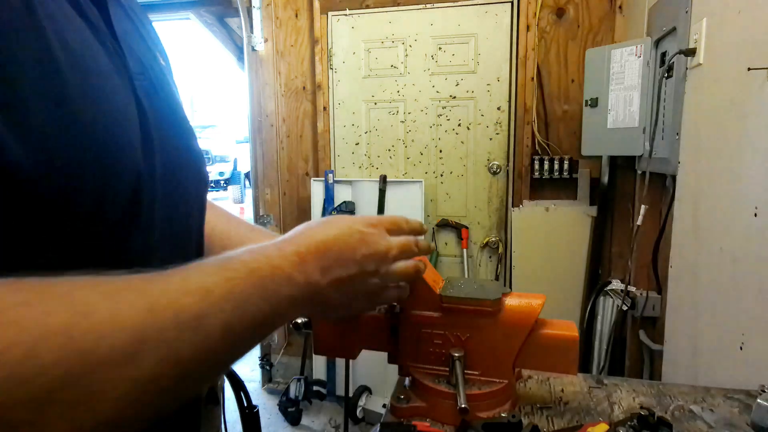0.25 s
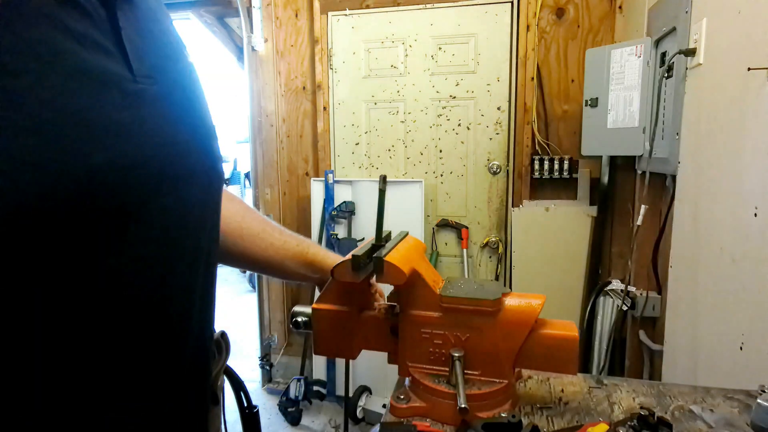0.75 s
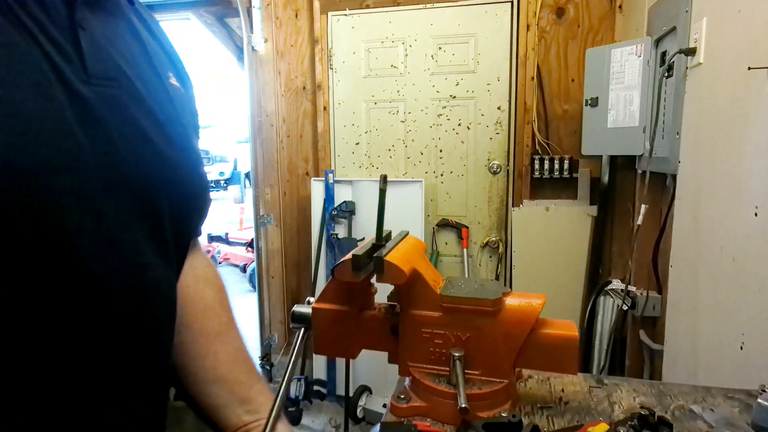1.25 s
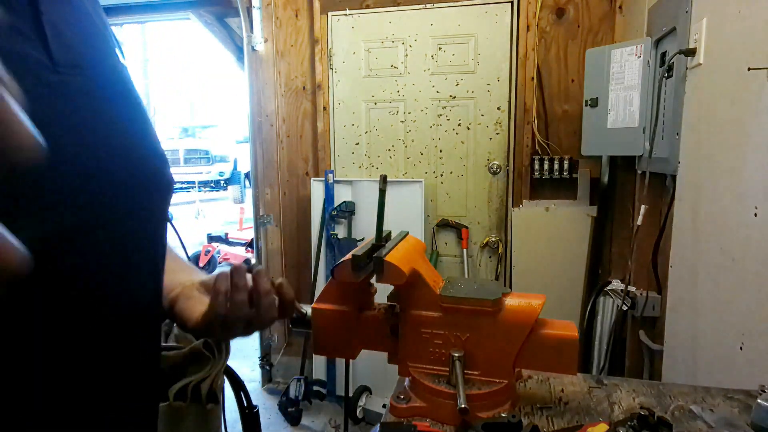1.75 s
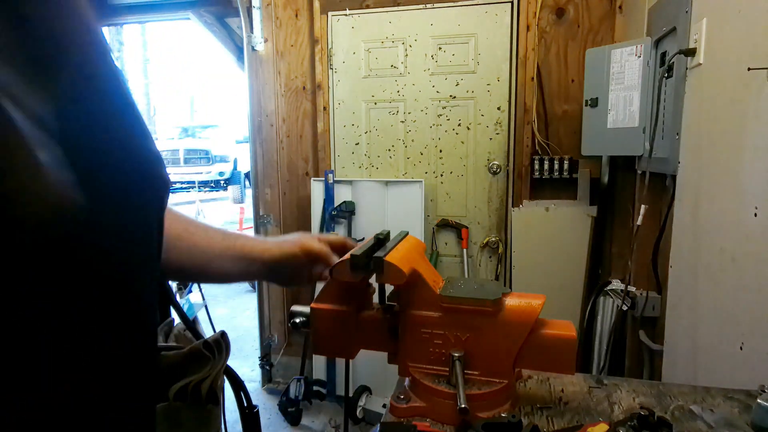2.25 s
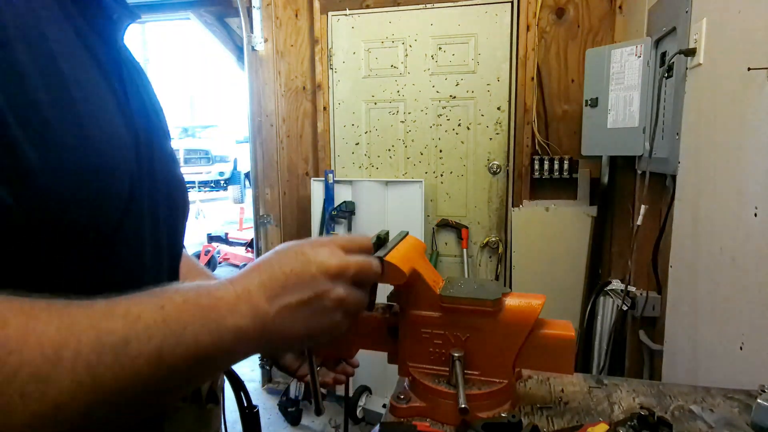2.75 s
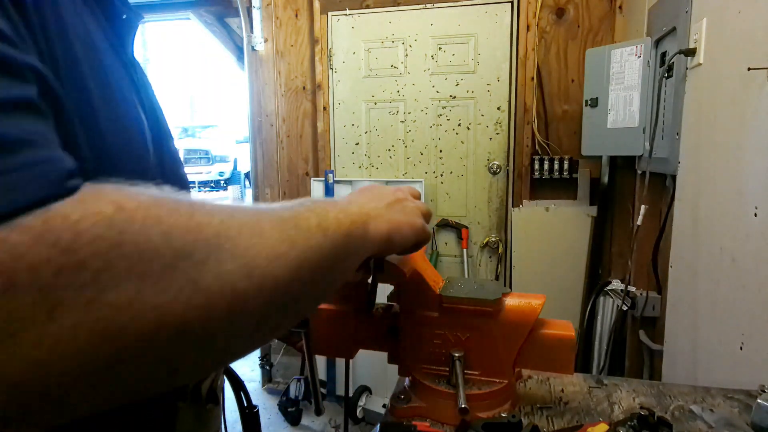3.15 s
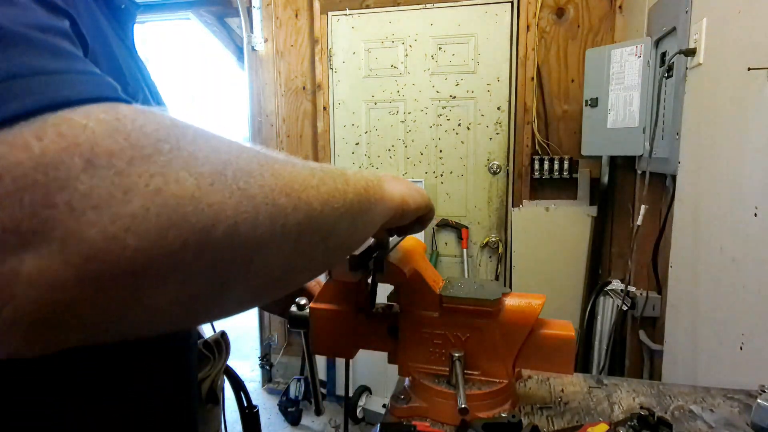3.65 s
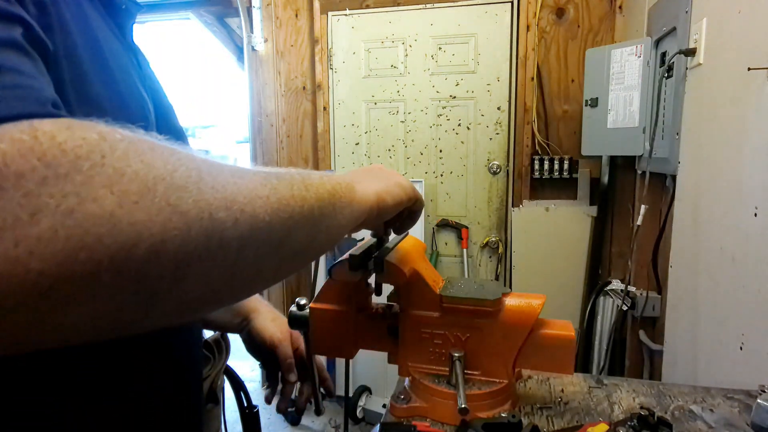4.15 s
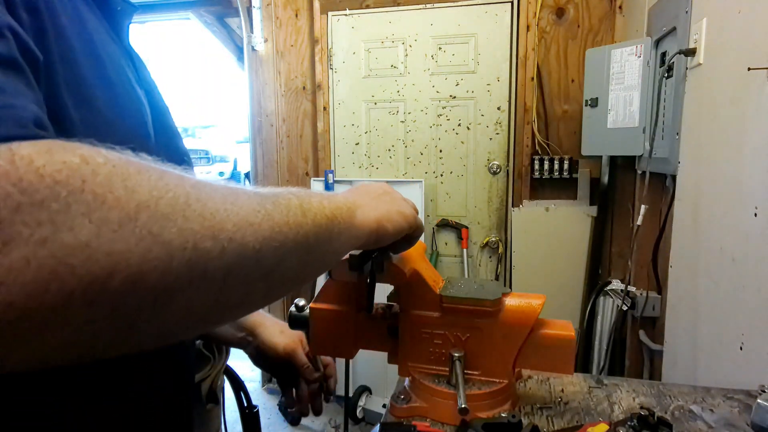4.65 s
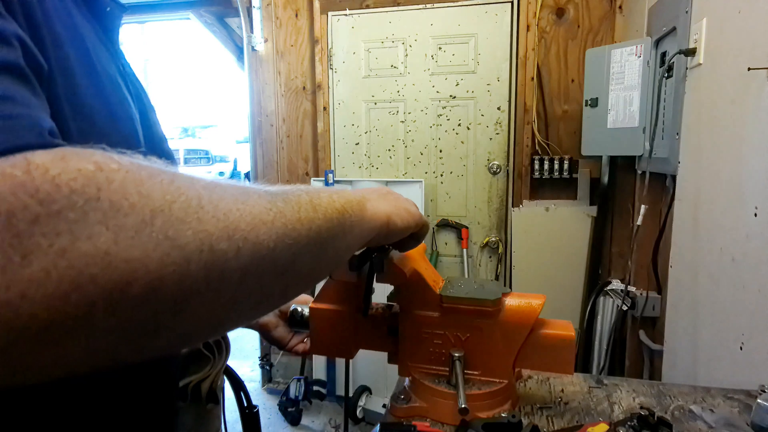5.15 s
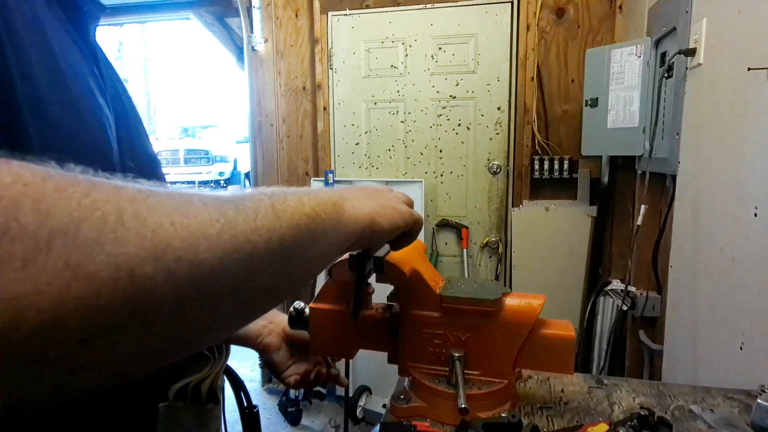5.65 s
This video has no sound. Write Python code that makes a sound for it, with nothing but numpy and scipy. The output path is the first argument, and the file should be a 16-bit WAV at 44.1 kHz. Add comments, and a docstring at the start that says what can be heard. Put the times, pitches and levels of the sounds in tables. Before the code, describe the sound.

In a small workshop, a cast vise clacks and rattles as its screw is turned, with cloth rustle and two overloaded microphone hits.

```python
"""Over faint rumble and hiss in a small wooden workshop, a cast bench vise knocks: modes plus decaying noise.
From 0.9 s cloth, probably a shirt, brushes the microphone (plucked resonances) as a hand turns the screw (slips).
At 1.28 and 1.38 s it flicks the microphone: cracks, thumps and pushes of air clip, and the gain ducks and creeps back.
From 2.2 s the bolt squeaks (a sine swell) and clinks between the jaws; the sliding handle and the slack screw
knock on until 5.7 s, ringing the steel parts. Soft bench bumps (low sines) are dotted about from 0.19 s."""
import sys
import numpy as np
from scipy import signal
from scipy.fft import rfft, irfft
from scipy.io import wavfile

SR = 44100
rng = np.random.default_rng(int(sys.argv[2]) if len(sys.argv) > 2 else 0)


def generate_wav(signal):
    """Clip the signal to [-1, 1] and save it as 16-bit WAV at the path in sys.argv[1]."""
    frames = np.transpose(np.atleast_2d(signal))
    scaled = np.clip(frames, -1, 1) * 32767
    pcm = np.round(scaled).astype(np.int16)
    wavfile.write(sys.argv[1], SR, pcm)


N = 260190
TIME = np.arange(N) / SR
AGE = TIME[:SR // 3]  # seconds since a blow


def from_db(db):
    """Decibels to gain."""
    return 10 ** (np.asarray(db) / 20)


def rms_one(x):
    """Scale to unit power."""
    return x / np.sqrt(np.mean(x ** 2) + 1e-20)


def at_hz(points, hz):
    """Read (Hz, dB) points on a log-frequency axis."""
    freqs, dbs = np.transpose(points)
    return np.interp(np.log(np.maximum(hz, 1)), np.log(freqs), dbs)


def decay(t60_s):
    """Envelope that falls 60 dB in t60_s."""
    exponent = AGE * (-np.log(1000) / max(t60_s, 1e-3))
    return np.exp(np.maximum(exponent, -40).astype(np.float32))


def noise(spectrum, size, tilt=None):
    """Noise coloured to unit power, then tilted if a tilt is given."""
    hz = np.arange(size // 2 + 1) * SR / size
    gain = rms_one(from_db(at_hz(spectrum, hz)))
    if tilt:
        gain = gain * from_db(at_hz(tilt, hz))
    return irfft(rfft(rng.standard_normal(size)) * gain, size)


def ring(hz, t60_s):
    """One mode: a sine of random phase dying away from height 1."""
    phase = 2 * np.pi * (hz * AGE + rng.random())
    return np.sin(phase.astype(np.float32)) * decay(t60_s)


def resonate(x, modes):
    """Parallel two-pole resonances of (pitch_hz, width_hz, level_db), signs alternating."""
    out = 0
    for k, (hz, width_hz, db) in enumerate(modes):
        r = np.exp(-np.pi * width_hz / SR)
        poles = [1, -2 * r * np.cos(2 * np.pi * hz / SR), r * r]
        band = signal.lfilter([1, 0, -1], poles, x + 1e-18)
        out = out + (-1) ** k * from_db(db) * (1 - r * r) / 2 * band
    return out


def filtered(x, order, hz, kind="low"):
    """Butterworth low-pass, high-pass or band-pass."""
    return signal.sosfilt(signal.butter(order, hz, kind, fs=SR, output="sos"), x)


def add(out, s, sound):
    """Mix a sound in at time s."""
    start = round(s * SR)
    out[start:start + len(sound)] += sound[:N - start]


# rumble of the quiet shop and hiss of the recorder, spectrum shape: pitch_hz, density_db (relative, per Hz)
FLOOR_SPECTRUM = [(12, -42.5), (20, 5), (47, -2), (64, -10.5), (126, -6.5), (185, -23.5), (225, -14.5),
                  (298, -22), (362, -16.5), (452, -24), (519, -22.5), (1160, -30.5), (1580, -34),
                  (2610, -39.5), (15500, -46)]


def background(level_db=-41):
    """Steady coloured noise: rumble below, hiss above."""
    return from_db(level_db) * noise(FLOOR_SPECTRUM, N)


# modes of the vise on its bench: pitch_hz, level_db (relative), t60_s
VISE_MODES = [(411, -8, .08), (474, -5, 0.18), (568, 1.5, 0.071), (613.5, 1, .11), (766.3, 0.5, 0.084),
              (812.7, -5, 0.1), (1057.3, -11.5, 0.18), (1214, -12, 0.14), (1355, -14, .11),
              (1600, -16, 0.052), (1755, -19, 0.12), (2440, -23, 0.064), (3383, -17.5, 0.089),
              (3970, -19, 0.058), (6500, -20, 0.19)]
# crowd of weaker modes between them, spectrum shape: pitch_hz, density_db (relative, per Hz)
CLATTER_SPECTRUM = [(50, -9.5), (130, -11), (270, 2), (380, -3.5), (600, 1.5), (1000, -7), (1750, -7),
                    (2100, -12.5), (3500, -8), (4500, -14), (7000, -16.5), (10000, -26.5), (12000, -30.5),
                    (15000, -43.5)]


def knock(level_db, bass_db, hardness_db, modes_db=-10.0, clatter_db=-7.5, clatter_t60_s=0.1,
          bass_t60_s=0.17, scatter_db=3.5, settle_s=0.0011):
    """One blow on the vise; light blows build up slowly as the parts settle, hard ones bite at once."""
    # a harder contact is shorter, and so brighter
    clang_db, treble_db = 0.81 * hardness_db, 1.05 * hardness_db
    # (Hz, dB) against a typical blow
    tilt = [(220, bass_db + 12.0), (450, 0.003), (850, 0.0025),
            (1200, clang_db - 4.5), (1900, clang_db - 3), (3500, treble_db - 14.0)]
    modes = 0
    for hz, db, t60_s in VISE_MODES:
        mode_db = db + at_hz(tilt, hz) + scatter_db * rng.normal()
        modes = modes + from_db(mode_db) * ring(hz * (1 + 0.014 * rng.normal()), t60_s)

    clatter = noise(CLATTER_SPECTRUM, len(AGE), tilt)
    bench = filtered(clatter, 1, 300)  # the wood carries the lows for longer
    clatter = bench * decay(bass_t60_s) + (clatter - bench) * decay(clatter_t60_s)

    rise_s = settle_s / np.sqrt(from_db(level_db))
    body = from_db(modes_db) * modes + from_db(clatter_db) * clatter
    return from_db(level_db) * body * (1 - np.exp(-AGE / rise_s))


# modes of each steel part, by name: pitch_hz, level_db (relative), t60_s
PART_MODES = { "jaw": [(758, 3, 0.066), (1352, -12.5, 0.11), (1776, -12.5, 0.1), (2670, -31, 0.11),
              (2781, -2.5, 0.045), (3295, -17, 0.056), (3950, -17, 0.097), (4700, -21.5, 0.054)],
              "spindle": [(789, -5, 0.12), (1040, -11, 0.051), (1175, 7.5, 0.024), (1636, -7, 0.11),
              (1730, -2, 0.077), (2700, -12, 0.032), (3420, -25, 0.073), (4820, -24, 0.038),
              (5000, -19.5, 0.093), (5100, -47, 0.073), (5300, -17, 0.04)], "bolt": [(3690, -3, 0.14),
              (9900, -5, 0.21)], "handle": [(3350, -7, 0.17), (6380, 1, 0.11), (6600, -2.5, 0.11),
              (6900, -9, 0.1), (10200, -11, 0.14)], "thread": [(7260, 0, 0.025), (8000, -2.5, 0.02),
              (8830, 2, 0.011), (10550, -5, 0.019), (11640, -6, 0.016), (13200, -14, .015)]}


def clink(part, contact_s=0.0024, rattle=0.69, rattle_hz=130):
    """A loose part rings; it chatters in its seat, which roughens every mode."""
    out = 0
    for hz, db, t60_s in PART_MODES[part]:
        chatter = rms_one(filtered(rng.standard_normal(len(AGE)), 2, rattle_hz))
        out = out + from_db(db) * ring(hz, t60_s) * (1 + rattle * chatter)
    return out * (1 - np.exp(-AGE / contact_s))


# how strongly a knock rings each part, by name: coupling_db (against the knock), per_hardness (dB per dB)
# the heavy jaw answers a soft contact, the small parts a hard one
COUPLING = {"jaw": (2.1, -0.35), "spindle": (-7, 0.36), "bolt": (-32.5, 1.55), "handle": (-27, 1),
            "thread": (-15, 1.09)}
# knocks of handle, screw and jaw: start_s, level_db, bass_db (against a typical blow),
KNOCKS = [ (0.082, -35.5, 16.5, 11.5, None, ""), (0.124, -10, -1, 7, None, "jaw"),
          (0.130, -14.5, -3, 4.5, None, "jaw handle"), (0.176, -32, 7, 18, None, ""),
          (1.193, -20.5, -5.5, -11, 0.041, ""), (2.170, -45, -20, 30.5, None, "thread"),
          (2.177, -13.5, -13, 15, None, "jaw spindle"), (2.191, -19.5, 3, 15.5, None, "thread bolt handle"),
          (2.217, -19, -12, 12.5, None, ""), (2.306, -19, -2, 2.5, None, ""),
          (2.357, -19, 3, -2.5, 0.02, ""), (2.436, -17, -11, 3.5, None, "bolt"),
          (2.558, -18, -9.5, 5, 0.031, "bolt"), (2.703, -30.5, -25, -2, None, ""),
          (3.489, -22.5, -4.5, -2.5, 0.0099, ""), (3.584, -23, -16, 1, 0.01, ""),
          (3.705, -31, -22, -15, None, ""), (3.937, -26.5, -1, 1, 0.022, ""),
          (4.049, -26.5, -4, 3.5, 0.044, ""), (4.447, -23, -8, -2.5, 0.027, "thread"),
          (4.646, -27, -0.5, -18, 0.023, ""), (4.697, -23.5, 0, -3.5, None, ""),
          (4.882, -18.5, -7, 3.5, None, ""), (5.174, -21.5, -17, -4.5, None, ""),
          (5.308, -21.5, -5.5, 1, 0.014, ""), (5.421, -22, -7, 1.5, 0.035, "handle"),
          (5.483, -16.5, -29, 7.5, None, "handle"), (5.586, -18, -32, 1, None, "thread"),
          (5.647, -10, -13.5, 0.5, None, "spindle bolt"), (5.743, -15.5, -13, -10.5, None, "spindle")]


def vise(rebound_loss_db=3):
    """Knocks shake the body and ring steel parts; some cross the slack and strike again, a little weaker."""
    out = np.zeros(N)
    for start_s, level_db, bass_db, hardness_db, rebound_s, parts in KNOCKS:
        add(out, start_s, knock(level_db, bass_db, hardness_db))
        if rebound_s:
            add(out, start_s + rebound_s, knock(level_db - rebound_loss_db, bass_db, hardness_db))
        for part in parts.split():
            coupling_db, per_hardness = COUPLING[part]
            part_db = level_db + coupling_db + per_hardness * hardness_db
            add(out, start_s, from_db(part_db) * clink(part))
    return out


# reverberation of the shop by band: low_hz, high_hz, t60_s
SHOP_BANDS = [(60.2, 310, 0.49), (390, 1800, 0.19), (1970, 5000, 0.25), (6000, 16000, 0.25)]


def shop(x, wet_db=-14.0, build_up_s=0.026):
    """Diffuse echoes off the wooden walls: bands of decaying noise, the lows lasting longest."""
    tail = 0
    for low_hz, high_hz, t60_s in SHOP_BANDS:
        band = filtered(rng.standard_normal(len(AGE)), 2, [low_hz, high_hz], "band")
        tail = tail + band * decay(t60_s)
    # silent for half the build-up time, full at one and a half times it
    tail = tail * np.clip(AGE / build_up_s - .5, 0, 1)
    tail = tail / np.sqrt(np.sum(tail ** 2))
    return x + from_db(wet_db) * signal.fftconvolve(x, tail)[:N]


# dull bumps of the bench and of the body against it: start_s, level_db, pitch_hz
BUMPS = [(0.188, -22.5, 88), (1.841, -19, 46.9), (2.32, -22, 117), (2.578, -25.5, 116), (4.894, -20, 59),
         (4.953, -19.5, 53.4)]


def bumps(t60_s=0.15, rise_s=0.0095):
    """Soft, low thuds: decaying sines with a rounded onset."""
    out = np.zeros(N)
    envelope = decay(t60_s) * (1 - np.exp(-AGE / rise_s))
    for start_s, level_db, hz in BUMPS:
        add(out, start_s, from_db(level_db) * np.sin(2 * np.pi * hz * AGE) * envelope)
    return out


def stroke(start_s, length_s, attack_s=0.018, release_s=0.008):
    """Pressure of the cloth: it lands, slides evenly and lifts off."""
    attack = np.clip((TIME - start_s) / attack_s, 0, 1)
    return attack * np.exp(-np.clip((TIME - start_s - length_s) / release_s, 0, 20))


# resonances of the microphone housing under the cloth: pitch_hz, width_hz, level_db (relative)
HOUSING = [(848, 83, 7.5), (1450, 203, 1), (3680, 350, -1.5), (6800, 570, -9), (10300, 1260, -10.5),
           (12700, 1500, -15), (15000, 2000, -18.5)]
# the cloth catches and lets go: start_s, peak_db (before the gain control), lowest_hz
CATCHES = [(0.925, -15, 590), (1.0964, -17, 2010), (1.392, -10.5, 3400)]
# strokes of cloth over the microphone: start_s, length_s, level_db
STROKES = [(0.932, 0.048, -38), (1.037, 0.092, -25)]


def cloth(fibres_per_s=5000, catch_t60_s=0.0082):
    """Fibres pluck the microphone housing, now and then catching on it."""
    plucks = (rng.random(N) < fibres_per_s / SR) * rng.standard_normal(N)
    pressure = sum(from_db(db) * stroke(start_s, length_s) for start_s, length_s, db in STROKES)
    out = pressure * rms_one(resonate(plucks, HOUSING))
    for start_s, peak_db, lowest_hz in CATCHES:
        burst = rng.standard_normal(len(AGE)) * decay(catch_t60_s)
        tick = filtered(resonate(burst, HOUSING[1:3]), 2, lowest_hz, "high")
        add(out, start_s, from_db(peak_db) * tick / np.abs(tick).max())
    return out


def swell(middle_s, length_s, edge_db):
    """Gain of one smooth push: 1 in the middle, edge_db lower at both ends."""
    position = 2 * (TIME - middle_s) / length_s
    return from_db(np.maximum(-edge_db * position ** 2, -200))


# pushes of the hand that turn the screw in its nut: middle_s, length_s, level_db
TURNS = [(1.143, 0.036, -29), (1.235, 0.23, -34), (1.9, 0.72, -47.5), (2.38, 0.24, -36.5),
         (3.62, 0.16, -48.5), (4.096, 0.074, -41), (4.663, 0.13, -43), (5.49, 0.13, -31.5),
         (5.57, 0.32, -42.5)]


def screw(grains_per_s=500, width_hz=90, dull_hz=650, resting_db=-62.0, edge_db=5):
    """With every push, tiny slips of the thread excite the vise's modes; a resting hand barely stirs them."""
    slips = (rng.random(N) < grains_per_s / SR) * rng.standard_normal(N)
    body = resonate(slips, [(hz, width_hz, db) for hz, db, t60_s in VISE_MODES])
    bench = resonate(slips, [(241.8, 110, -7.0)])
    grind = rms_one(filtered(body + bench, 1, dull_hz))  # favours the lower modes
    pushes = [from_db(db) * swell(middle_s, length_s, edge_db) for middle_s, length_s, db in TURNS]
    effort = np.maximum(np.max(pushes, axis=0), from_db(resting_db))
    return effort * grind


# spectrum shape of a flick's crack: pitch_hz, density_db (relative, per Hz)
CRACK_SPECTRUM = [(200, -6), (350, -9), (880, 1.5), (1300, -8), (1800, -11), (2400, 2), (3000, -1.5),
                  (4000, 0.5), (5200, -17), (6200, -17), (9000, -25.5), (15000, -27)]
# flicks on the microphone: start_s, crack_db, crack_s (length), ring_hz (where the housing rings most),
# thump_db, push (signed push of air, in full scales before the gain control)
FLICKS = [(1.2762, 16.5, 0.0031, 5155, 1.5, 1.2), (1.3804, 15, 0.003, 2390, 5.5, -0.87)]


def flicks(thump_hz=620, sag_s=0.0051, thump_t60_s=0.03, cavity_hz=475, cavity_t60_s=0.15, cavity_db=-19,
           scrape_db=-36, scrape_s=0.0033, push_s=0.00018, ring_width_hz=400, ring_db=1.5):
    """A brief scrape, a push of air, a crack, and a thump that sags onto the pitch of the microphone's cavity."""
    out = np.zeros(N)
    pitch_hz = cavity_hz + (thump_hz - cavity_hz) * np.exp(-AGE / sag_s)
    thump_envelope = decay(thump_t60_s) + from_db(cavity_db) * decay(cavity_t60_s)
    thump = np.sin(2 * np.pi * np.cumsum(pitch_hz) / SR) * thump_envelope
    for start_s, crack_db, crack_s, ring_hz, thump_db, push in FLICKS:
        burst = noise(CRACK_SPECTRUM, len(AGE)) * np.exp(-2 * (AGE / crack_s) ** 2)
        crack = from_db(crack_db) * burst
        housing = resonate(crack, [(ring_hz, ring_width_hz, ring_db)])
        scrape = from_db(crack_db + scrape_db) * noise(CRACK_SPECTRUM, len(AGE)) * (AGE < scrape_s)
        air = push * np.exp(-((AGE - scrape_s) / push_s) ** 2)  # peaks as the scrape ends
        add(out, start_s - scrape_s, scrape + air)
        add(out, start_s + push_s, crack + housing)
        add(out, start_s, np.sign(push) * from_db(thump_db) * thump)
    return out


def squeak(middle_s=2.247, length_s=0.044, level_db=-28.5, edge_db=12):
    """The bolt slips in the jaws once; friction drives its lowest mode for a moment."""
    bolt_hz = PART_MODES["bolt"][0][0]
    return from_db(level_db) * swell(middle_s, length_s, edge_db) * np.sin(2 * np.pi * bolt_hz * TIME)


def scene():
    """Knocks and screw echo in the shop; squeak, bumps, cloth, flicks and background stay dry."""
    work = shop(vise() + screw()) + squeak() + bumps()
    return (work + cloth() + flicks() + background())[None]


def record(dry, threshold_db=-9.0, most_db=5.5, release_db_per_s=7.5, attack_s=0.018, cutoff_hz=15700):
    """Gain control ducks after loud sounds and recovers slowly; overloads clip; the top is cut."""
    power = signal.lfilter([1 / 200], [1, 1 / 200 - 1], dry[0] ** 2)  # averaged over about 200 samples
    over_db = np.clip(10 * np.log10(power + 1e-12) - threshold_db, 0, most_db)
    # hold each peak, then let it fall along a straight line in dB
    release_db = release_db_per_s * TIME
    held_db = np.maximum.accumulate(over_db + release_db) - release_db
    pole = np.exp(-1 / (attack_s * SR))
    duck_db = signal.lfilter([1 - pole], [1, -pole], held_db)
    clipped = np.clip(dry * from_db(-duck_db), -1, 1)
    top_cut = signal.ellip(10, .1, 80, cutoff_hz, fs=SR, output="sos")
    return signal.sosfilt(top_cut, clipped)


dry = scene()
out = record(dry)
generate_wav(out)
```